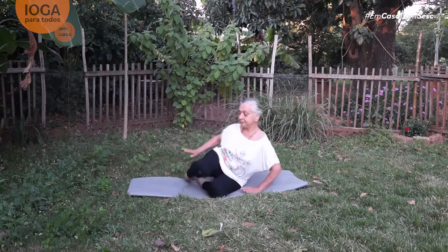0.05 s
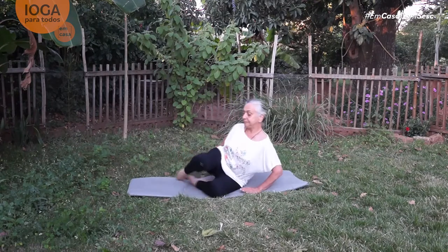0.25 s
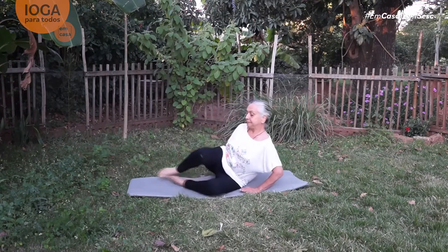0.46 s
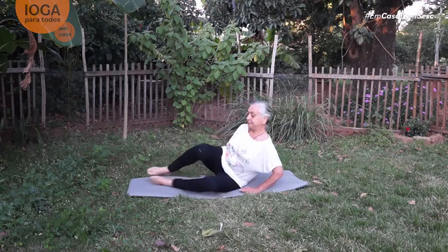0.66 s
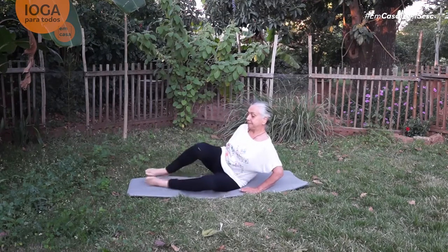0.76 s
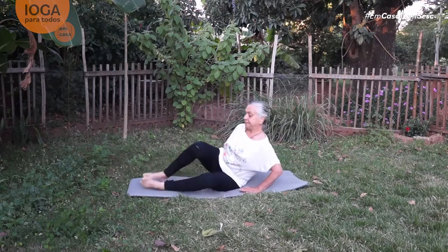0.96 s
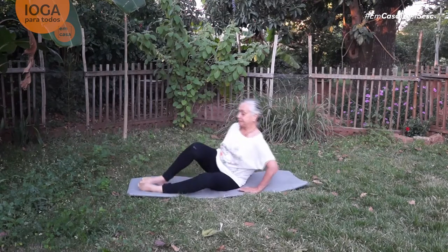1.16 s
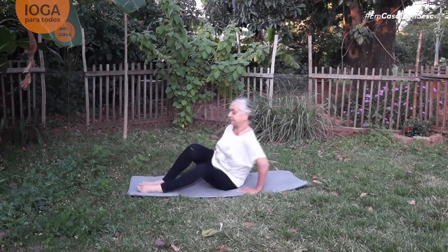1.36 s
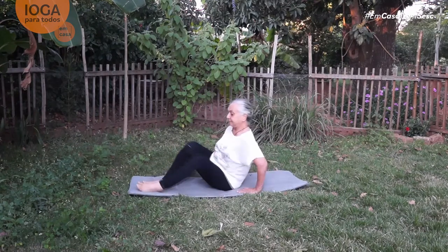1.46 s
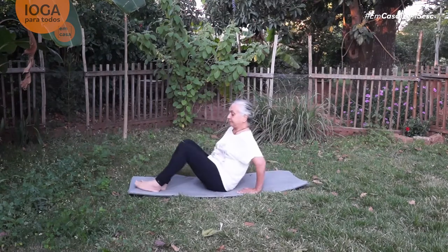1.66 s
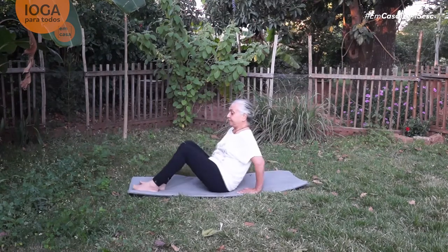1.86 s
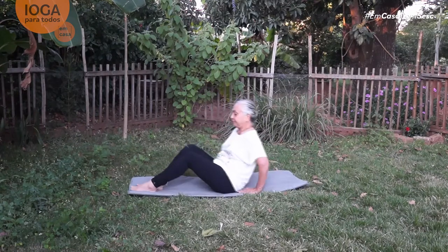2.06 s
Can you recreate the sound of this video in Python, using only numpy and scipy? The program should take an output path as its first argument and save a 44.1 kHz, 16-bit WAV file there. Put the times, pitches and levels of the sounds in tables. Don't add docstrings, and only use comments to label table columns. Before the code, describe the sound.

Close rustle of clothing and bare heels dragging over a foam mat on a quiet lawn.

```python
import sys
import numpy as np
from scipy import signal
from scipy.fft import rfft, irfft, next_fast_len
from scipy.io import wavfile
from scipy.ndimage import uniform_filter1d

SR = 44100
rng = np.random.default_rng(int(sys.argv[2]) if len(sys.argv) > 2 else 0)


def invert_db(x):
    u = np.asarray(x, float) / 20
    return 10 ** u


def persist_wave(psi):
    counts = np.round(np.clip(psi, -1, 1) * 32767).astype(np.int16)
    wavfile.write(sys.argv[1], SR, np.atleast_2d(counts).T)


N = 92610
TIME = np.arange(N) / SR

# time in seconds, level in dB, brightness in dB per octave, fine fizz in dB.
SLIDING = [(0.0, -52, -1.5, -21), (0.06, -46, 4.5, -17), (0.27, -40, -0.5, 0), (0.3, -33.5, -1.5, 3.5),
           (0.47, -36, 0, 5.5), (0.63, -30.5, 3, 4.5), (0.73, -35.5, 7, -0.5), (1.13, -45, -1, 9.5),
           (1.2, -51, -1.5, 2.5), (1.37, -47, 1, -12), (1.39, -40, 2.5, -11), (1.43, -44, 2, -6.5),
           (1.67, -37, -1, 0), (1.91, -48, -4, -2.5), (2.1, -47, 1.5, -4)]
# frequency in Hz, level in dB per Hz.
FIBRE_COLOUR = [(530, -79), (900, -86), (1200, -39), (1730, -12.5), (2110, -6.5), (4010, -3.5),
                (5520, -4.5), (7780, -0.5), (15300, -28)]
# time in seconds, foam level in dB, crackle relative to foam in dB.
WEIGHT_SHIFT = [(0.0, -57, -18.5), (0.26, -75.5, 21), (0.29, -58.5, 12), (0.51, -56.5, -3),
                (0.55, -78.5, 23), (0.58, -56.5, -4), (0.83, -69, 14.5), (0.87, -61.5, 6),
                (1.06, -71.5, 15.5), (1.19, -62.5, 5.5), (1.22, -53.5, 7), (1.29, -48, 3.5),
                (1.4, -45.5, 1), (1.45, -49.5, -4.5), (1.82, -58.5, 6.5), (1.88, -53, -4), (2.04, -56, 1),
                (2.1, -53, 3)]
# frequency in Hz, level in dB per Hz.
FOAM_COLOUR = [(24, -42), (40, -22), (81, -20.5), (182, 2.5), (497, -2), (733, -2.5), (800, -11),
               (1040, -33), (1760, -120)]
# frequency in Hz, level in dB.
FOLD_COLOUR = [(700, -1.5), (1000, 5), (1500, 3), (2200, 0.5), (3000, -19.5)]
# frequency in Hz, level in dB.
AIR_COLOUR = [(25, -35), (60, -2), (150, 5), (400, -11.5), (700, 10), (2000, -10.5), (8000, -24)]
# time in seconds, level in dB.
HUM_LEVEL = [(0.0, -110), (0.09, -77), (0.23, -94), (0.37, -60), (0.73, -94), (0.85, -59.5), (1.1, -71),
             (1.17, -55.5), (1.3, -65), (1.4, -58), (1.61, -80), (1.72, -59.5), (1.79, -77), (1.88, -54.5),
             (1.97, -65), (2.02, -51), (2.1, -51)]
# start in seconds, length in seconds, pitch in Hz, level in dB.
DRAGS = [(0.088, 0.3, 1053, -57.5), (0.193, 0.075, 2310, -47), (0.233, 0.05, 2680, -45.5),
         (0.693, 0.15, 1358, -50.5), (0.54, 0.059, 6000, -41), (0.44, 0.051, 6300, -43),
         (.56, 0.03, 3880, -40), (1.2, 0.079, 1500, -60), (1.05, 0.25, 990, -59), (1.12, .1, 750, -58),
         (1.4, 0.16, 1520, -56.5), (1.78, 0.17, 1080, -60), (0.339, 0.016, 7400, -32),
         (1.925, 0.1, 950, -51.5), (2.01, 0.057, 1038, -53), (.4, 0.027, 6430, -37.5),
         (0.557, 0.15, 8800, -36.5), (1.53, 0.085, 3820, -41), (0.43, 0.073, 7200, -48),
         (.65, 0.055, 4400, -39.5), (0.58, 0.038, 2990, -42), (0.277, 0.18, 1085, -59),
         (0.67, 0.031, 5560, -38.5)]
# start in seconds, peak in dB, pitch in Hz, ring time to -60 dB in seconds.
LANDINGS = [(0.209, -55, 563, 0.043), (.285, -39.5, 379, 0.061), (.345, -41, 320, 0.066),
            (0.364, -44, 360, 0.071), (.415, -41, 450, 0.038), (.415, -45, 188, 0.071),
            (0.466, -50, 60, 0.11), (0.578, -50.5, 343, 0.083), (0.847, -54, 127, 0.24),
            (.867, -54, 216, .08), (.91, -53.5, 96, 0.19), (.595, -52.5, 101, 0.11), (1.155, -47, 40, 0.16),
            (1.234, -41, 1280, .04), (1.258, -38.5, 1060, .03), (1.292, -44, 1220, 0.027),
            (1.299, -41, 1500, .03), (1.326, -44, 324, .04), (1.346, -36.5, 397, 0.032),
            (1.37, -45, 300, 0.078), (1.385, -36, 460, .03), (1.387, -37, 1030, 0.016),
            (1.408, -48, 350, 0.071), (1.451, -39, 477, 0.12), (1.57, -44, 375, 0.065),
            (1.871, -37, 562, 0.029), (1.885, -42, 547, .03), (1.915, -36.5, 340, 0.044),
            (1.921, -41, 1163, 0.043), (1.969, -46, 473, .03)]
# start in seconds, peak in dB.
GRASS_TICKS = [(.2246, -33), (.2885, -27), (.5342, -26), (.5467, -20), (.572, -23), (.6015, -18),
               (.637, -21), (1.2236, -38), (1.3753, -34), (1.3887, -31), (1.5444, -30), (1.7574, -32)]
# time in seconds, rib rate in Hz, level in dB.
HEEL_OUT = [(.24, 1500, -58), (.281, 1900, -51), (.292, 2800, -36), (.312, 3250, -38), (.327, 4100, -36),
            (.337, 4800, -42), (.346, 5700, -38), (.353, 6600, -45), (.361, 7300, -37)]
# time in seconds, rib rate in Hz, level in dB.
HEEL_SLOWING = [(.6, 5870, -57), (.63, 4800, -35), (.68, 4320, -44.5), (.73, 3410, -39.5), (.79, 2600, -45),
                (.88, 1840, -50.5), (0.999, 1450, -57)]
# time in seconds, rib rate in Hz, level in dB.
HEEL_BACK = [(1.4, 2200, -65), (1.46, 2780, -47), (1.52, 3530, -47), (1.59, 3750, -48.5),
             (1.66, 3300, -45.5), (1.73, 2320, -51.5), (1.82, 2010, -57.5)]
RIB_SPREADS = [.06, .23, .48]
RIB_CLEANNESS = [.85, .17, 0]
# frequency in Hz, side minus mid in dB.
SIDE_SCATTER = [(30, -25), (300, -5.5), (900, -5), (1800, -17.5), (3500, -25), (6800, -32), (8500, -9),
                (10500, -32)]
# frequency in Hz, level in dB.
LEAF_COLOUR = [(900, -5.5), (2000, -4.5), (6000, -13), (9000, -12), (10500, -18)]
# time in seconds, lean to the left in dB.
LEAN_LEFT = [(0, 0.67), (.9, 0.02), (1.3, .5), (1.7, 0.58), (2.1, 0.95)]
# centre in Hz, width in Hz, level in dB per bin.
NOISE_PROFILE = [(807, 211, -70), (1755, 77, -73.5), (1500, 1130, -83.5), (3780, 157, -70.5),
                 (3610, 510, -77), (5100, 90, -79), (7660, 430, -75), (12720, 100, -85), (225, 56, -78)]

FADE_S = 0.12
EDGE_HZ = 15440


def evened(x):
    return x / np.sqrt(np.mean(x ** 2) + 1e-20)


def read(points, hz):
    f, value = np.transpose(points)
    return np.interp(np.log(hz + 1), np.log(f + 1), value)


def follow(table, column, t=TIME):
    rows = np.array(table)
    return np.interp(t, rows[:, 0], rows[:, column])


def drift(count, size):
    return evened(uniform_filter1d(rng.standard_normal(count), size=size))


def colour(x, db_of):
    size = next_fast_len(N + 4096)
    gain = invert_db(db_of(np.fft.rfftfreq(size, 1 / SR)))
    return irfft(rfft(x, size) * gain, size)[:N]


def coloured_noise(points):
    return evened(colour(rng.standard_normal(N), lambda f: read(points, f)))


def resonate(x, hz, width):
    turn = np.exp(2j * np.pi * np.cumsum(hz * np.ones(N)) / SR)
    r = np.exp(-np.pi * width / SR)
    smooth = signal.lfilter([1 - r, 0, 0], np.convolve([1, -r], [1, -r]), x / turn)
    return 2 * (turn * smooth).real


def grains(per_s, spread_db, share):
    u, e, n = rng.random(N), rng.exponential(1, N), rng.standard_normal((2, N))
    clicks = (u < per_s / SR) * invert_db(spread_db * np.minimum(e, 4)) * np.sign(n[0])
    return np.sqrt(share) * evened(clicks) + np.sqrt(1 - share) * n[1]


def fibre_slide():
    tilt_hz, fizz_hz, patch_db = 5000, 9500, 1.5
    slips = grains(per_s=2500, spread_db=3, share=0.21)
    hz, t, z = signal.stft(slips, SR, nperseg=256, noverlap=192)
    field = rng.standard_normal((len(t), len(hz))).T
    patches = evened(uniform_filter1d(uniform_filter1d(field, size=5, axis=0), size=25, axis=1))
    f = hz[:, None]
    tilt = np.log2((f + 200) / tilt_hz) * follow(SLIDING, 2, t)
    fizz = follow(SLIDING, 3, t) / (1 + (fizz_hz / (f + 1)) ** 10)
    gain = invert_db(read(FIBRE_COLOUR, hz)[:, None] + tilt + fizz)
    gain = gain / np.sqrt((gain ** 2).mean(0)) * invert_db(patch_db * patches)
    hiss = signal.istft(z * gain, SR, nperseg=256, noverlap=192)[1][:N]
    return invert_db(follow(SLIDING, 1) - 0.5) * evened(hiss)


def mat_creases():
    crumples = grains(per_s=660, spread_db=2, share=0.46)
    crackles = grains(per_s=1200, spread_db=5.8, share=0.4)
    foam = evened(colour(crumples, lambda f: read(FOAM_COLOUR, f)))
    fold = evened(colour(crackles, lambda f: read(FOLD_COLOUR, f)))
    return invert_db(follow(WEIGHT_SHIFT, 1) - 3) * (foam + invert_db(follow(WEIGHT_SHIFT, 2)) * fold)


def garden():
    air_db, hum_hz, hum_width_hz, hum_fuzz, whine_hz, whine_db = -65.5, 120, 26, 0.55, 13184, -77
    air = invert_db(air_db) * coloured_noise(AIR_COLOUR)
    whine = invert_db(whine_db) * np.sqrt(2) * np.sin(2 * np.pi * whine_hz * TIME)
    waver = evened(resonate(rng.standard_normal(N), hum_hz, hum_width_hz))
    hum = hum_fuzz * waver + np.sin(2 * np.pi * hum_hz * TIME)
    return air + whine + invert_db(follow(HUM_LEVEL, 1)) * hum


def scuffs():
    drive = grains(per_s=3000, spread_db=4.6, share=0.85)
    out = np.zeros(N)
    for s, length, hz, db in DRAGS:
        swell = np.sin(np.pi * np.clip((TIME - s) / length, 0, 1)) ** 2
        out += invert_db(db) * swell * evened(resonate(drive, hz, 0.11 * hz))
    return out


def thuds():
    level_db, rise_cycles = 3, 0.91
    out, t = np.zeros(N + 4096), np.arange(4096) / SR
    for s, db, hz, t60 in LANDINGS:
        wobble = 0.66 + 0.23 * drift(4096, size=70)
        rise = np.minimum(t * hz / rise_cycles, 1)
        ring = invert_db(db + level_db - 60 * t / t60) * np.sin(2 * np.pi * hz * t)
        out[round(s * SR):][:4096] += rise * wobble * ring
    return out[:N]


def ticks():
    tick_hz, width_hz, level_db, t60 = 6950, 3600, -5, 0.012
    out, t = np.zeros(N + 4096), np.arange(4096) / SR
    for s, db in GRASS_TICKS:
        burst = evened(resonate(rng.standard_normal(N), tick_hz, width_hz))[:4096]
        out[round(s * SR):][:4096] += invert_db(db + level_db - 60 * t / t60) * burst
    return out[:N]


def rib_zip(path, spread, clean):
    fuzzy_octave_db, octave_db, third_db, flutter_db = -10, -4.5, -9, 1.3
    hz = follow(path, 1)
    inside = (TIME > path[0][0]) & (TIME < path[-1][0])
    has_octave = 2 * hz < 9500
    drive = grains(per_s=3500, spread_db=0.67, share=0.63)
    width = spread * hz[inside].mean()
    jitter = 1 + 0.012 * drift(N, size=90)
    turns = 2 * np.pi * np.cumsum(hz * jitter) / SR
    tone = np.sin(turns) + invert_db(octave_db) * has_octave * np.sin(2 * turns)
    tone = tone + invert_db(third_db) * (3 * hz < EDGE_HZ) * np.sin(3 * turns)
    fuzz = evened(resonate(drive, hz, width))
    fuzz = fuzz + invert_db(fuzzy_octave_db) * has_octave * evened(resonate(drive, 2 * hz, 1.1 * width))
    note = (1 - clean) * fuzz + clean * np.sqrt(2) * tone
    flutter = np.tanh(drift(N, size=260))
    return inside * invert_db(follow(path, 2) + flutter_db * flutter) * note


def snap():
    start_s, peak_db, hz, t60 = 0.3462, -24, 1700, 0.0057
    out, t = np.zeros(N), np.arange(4096) / SR
    out[round(start_s * SR):][:4096] = invert_db(peak_db - 60 * t / t60) * np.sin(2 * np.pi * hz * t)
    return out


def stereo(mid):
    leaves_db, wide_top_hz = -59.5, 10600
    hz, t, z = signal.stft(mid, SR, nperseg=512)
    a, b = rng.standard_normal((len(t), len(hz), 2)).T
    size = np.sqrt(abs(uniform_filter1d(abs(z) ** 2, size=3, axis=0)))
    spread = size * (invert_db(read(SIDE_SCATTER, hz)) * (hz > 1))[:, None]
    side = signal.istft(spread * (a + 1j * b), SR, nperseg=512)[1][:N]
    side = side + invert_db(leaves_db) * coloured_noise(LEAF_COLOUR) * np.minimum(TIME / FADE_S, 1)
    side = colour(side, lambda f: -20 * np.log10(1 + 70 / (f + 1)) - 60 * (f > wide_top_hz))
    lean = invert_db(np.array([[1], [-1]]) * follow(LEAN_LEFT, 1))
    return np.array([mid + side, mid - side]) * lean


def scene():
    body = fibre_slide() + mat_creases() + scuffs() + thuds() + ticks() + snap()
    for path, spread, clean in zip([HEEL_OUT, HEEL_SLOWING, HEEL_BACK], RIB_SPREADS, RIB_CLEANNESS):
        body = body + rib_zip(path, spread, clean)
    return stereo(body * np.minimum(TIME / FADE_S + 0.37, 1) + garden())


def roll_off(x):
    return signal.sosfilt(signal.butter(12, 15430, fs=SR, output="sos"), x)


def record(dry):
    floor_db, top_hz, top_db, tilt_db_per_khz, ragged_db = -20, 12400, -95, 2.2, 3
    hz, t, z = signal.stft(dry, SR, nperseg=1024, noverlap=768)
    power = (abs(z) ** 2).mean(0)
    power = uniform_filter1d(uniform_filter1d(power, size=9, axis=1), size=3, axis=0)
    noise = np.zeros(len(hz))
    for at_hz, width, db in NOISE_PROFILE:
        noise += invert_db(2 * db) * np.exp(-((hz - at_hz) / width) ** 4)
    gain = np.maximum(1 - noise[:, None] / (abs(power) + 1e-20), invert_db(floor_db))
    gain = gain * (hz < EDGE_HZ)[:, None]
    blocks = rng.standard_normal((len(t) // 8 + 1, len(hz) // 12 + 1))
    ragged = np.repeat(np.repeat(blocks, 8, axis=0), 12, axis=1)[:len(t), :len(hz)].T
    limit_db = top_db + tilt_db_per_khz * (hz[:, None] - top_hz) / 1000 + ragged_db * ragged
    weak = abs(uniform_filter1d(power, size=9, axis=0)) < invert_db(2 * limit_db)
    gain = gain * ~(weak & (hz > top_hz)[:, None])
    mix = signal.istft(z * gain, SR, nperseg=1024, noverlap=768)[1][:, :N]
    return roll_off(mix)


dry = scene()
out = record(dry)
persist_wave(out)
```